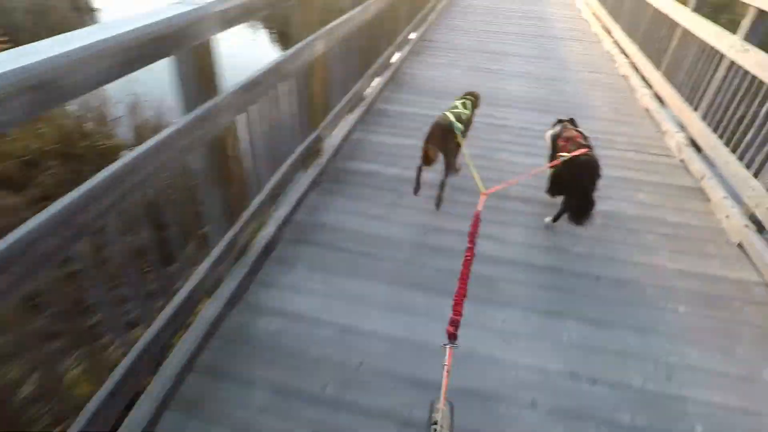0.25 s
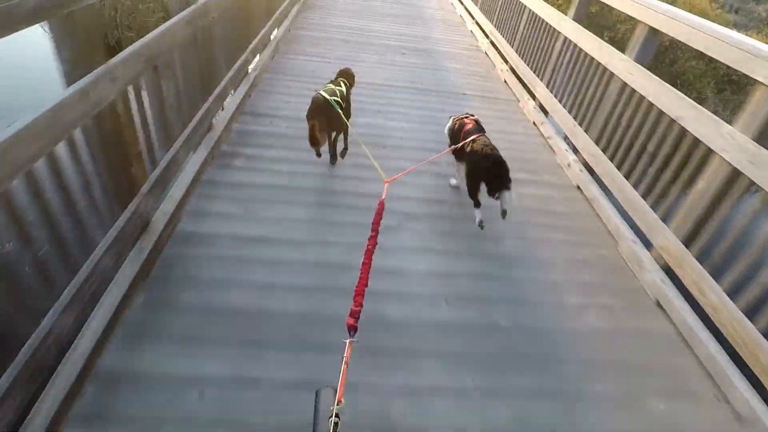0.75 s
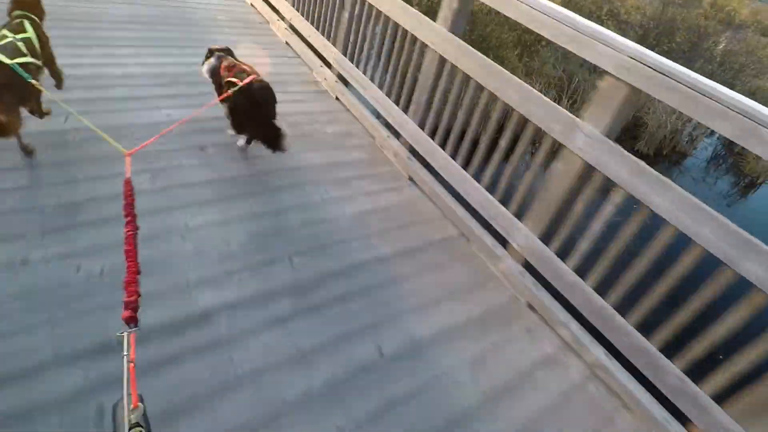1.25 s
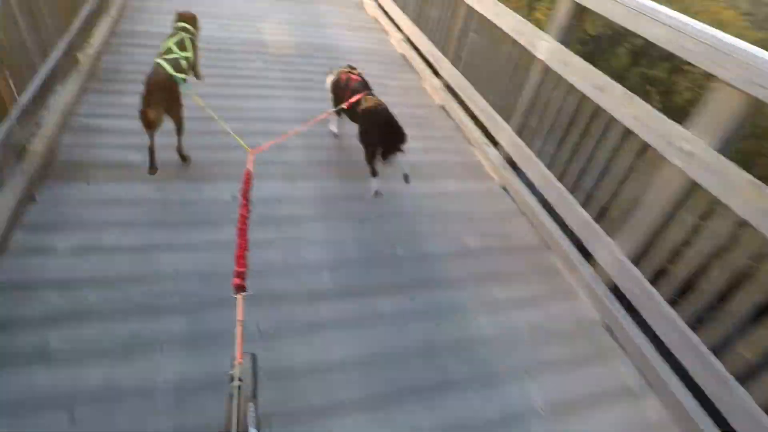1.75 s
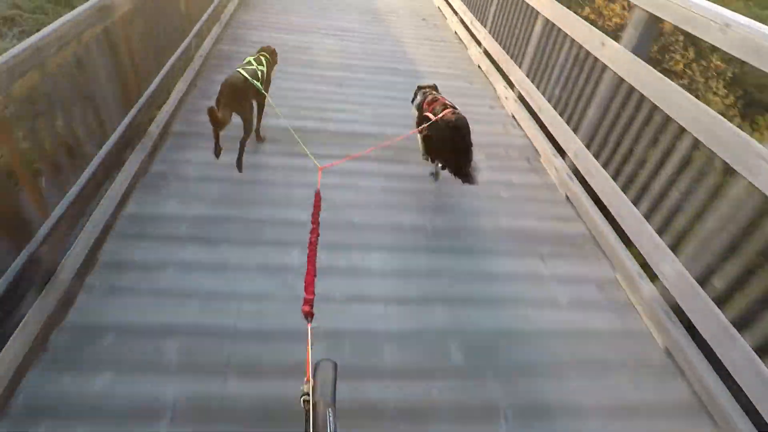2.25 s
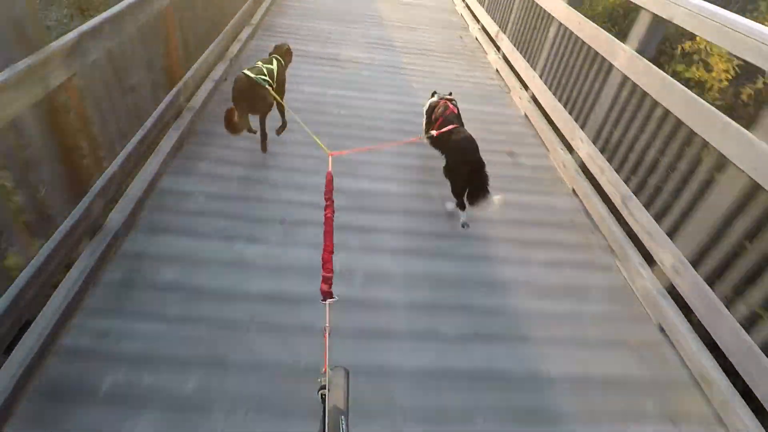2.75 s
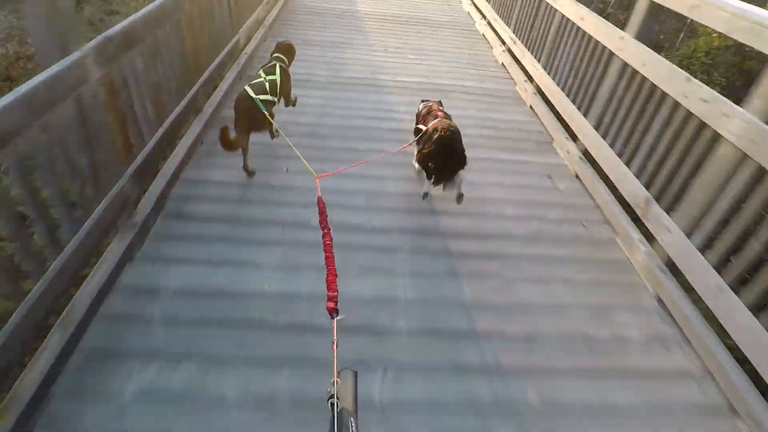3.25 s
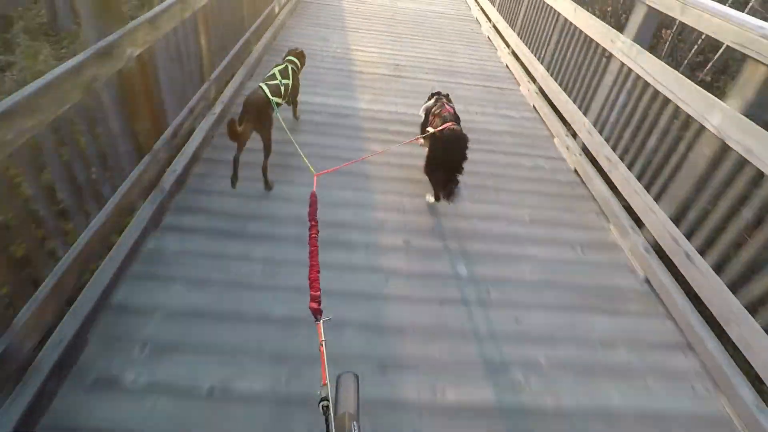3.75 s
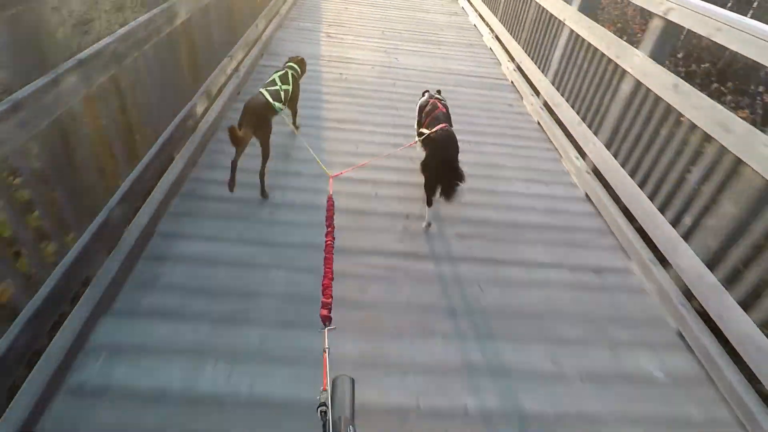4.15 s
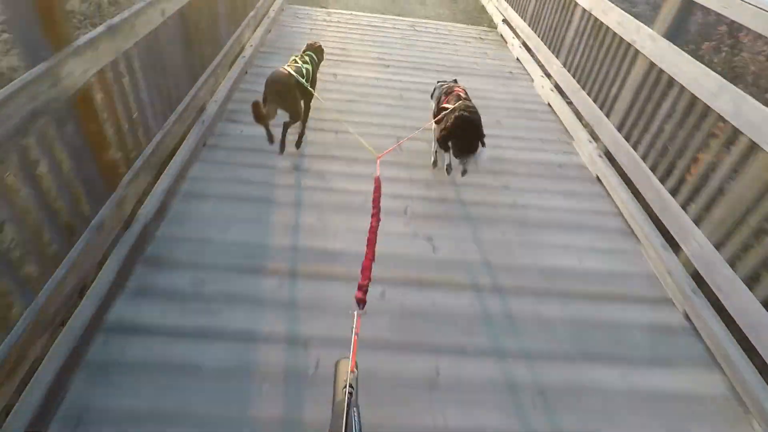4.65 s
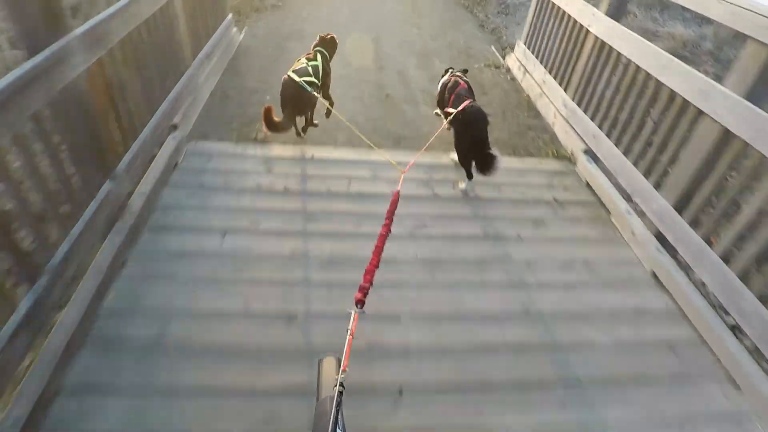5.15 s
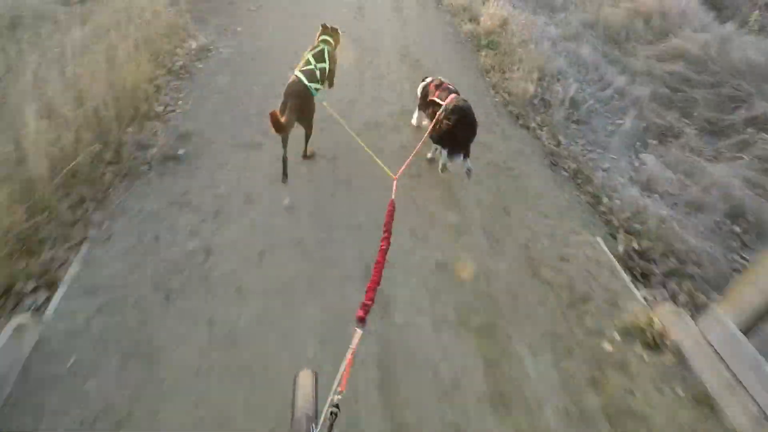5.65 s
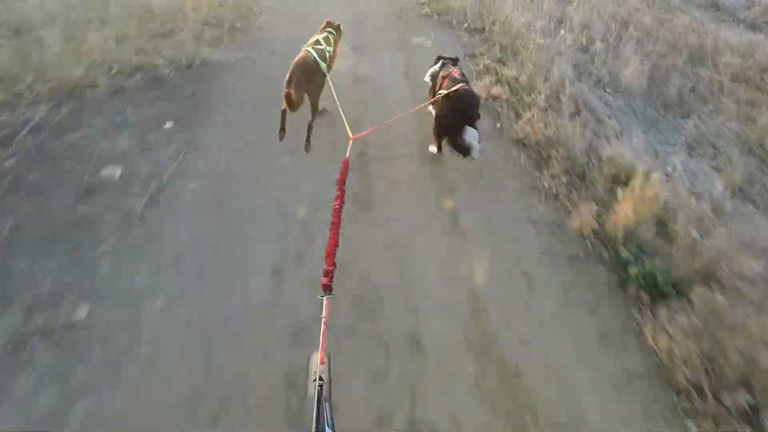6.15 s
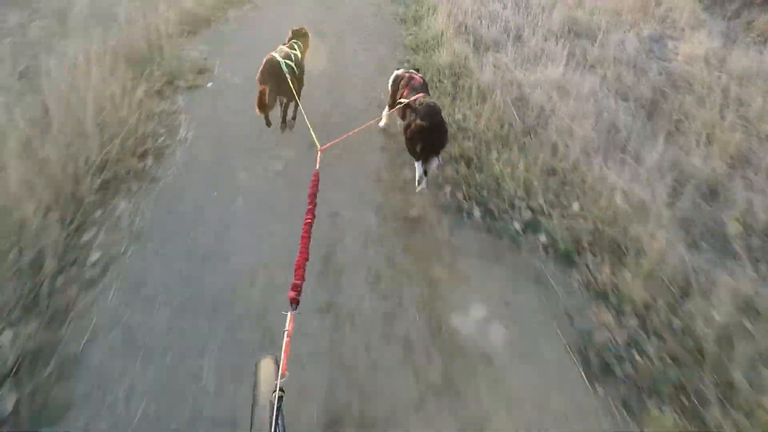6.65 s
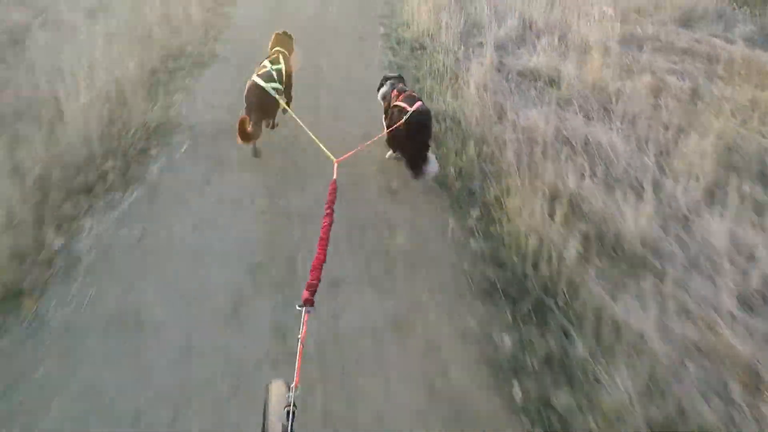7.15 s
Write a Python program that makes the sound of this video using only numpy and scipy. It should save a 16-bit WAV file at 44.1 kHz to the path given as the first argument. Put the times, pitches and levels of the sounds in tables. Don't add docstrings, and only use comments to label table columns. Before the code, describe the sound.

Outdoors, close wind noise dominates a microphone on a moving rider: low thuds, buffeting and crackling gusts, easing briefly as it turns aside early on. Beneath it, two running dogs click their claws on wooden planks, tags jingle with each stride and tyres hiss faintly. Leaving the bridge, a metal hook clinks and tags ring brightly; then paws are softer on dirt.

```python
import sys
import numpy as np
from scipy import signal
from scipy.fft import rfft, irfft, next_fast_len
from scipy.io import wavfile
from scipy.ndimage import uniform_filter1d

SR = 44100
rng = np.random.default_rng(int(sys.argv[2]) if len(sys.argv) > 2 else 0)


def undo_db(level):
    steps = np.asarray(level, float) / 20
    return 10 ** steps


def persist_wave(psi):
    counts = np.round(np.clip(psi, -1, 1) * 32767).astype(np.int16)
    wavfile.write(sys.argv[1], SR, np.atleast_2d(counts).T)


N = 326869
TIME = np.arange(N) / SR


def colour(x, shape):
    hz, db = np.transpose(shape)
    size = next_fast_len(N)
    f = np.arange(size // 2 + 1) * SR / size + 1
    gain = undo_db(np.interp(np.log(f), np.log(hz), db))
    return irfft(rfft(x, size) * gain, size)[:N]


def unit(x):
    return x / np.sqrt(np.mean(x ** 2))


def band(x, lo_hz, hi_hz, order=2):
    return signal.sosfilt(signal.butter(order, [lo_hz, hi_hz], "band", fs=SR, output="sos"), x)


def walk(rate):
    hold = int(SR / rate)
    levels = rng.standard_normal(N // hold + 1)
    steps = np.repeat(levels, hold)
    return unit(uniform_filter1d(uniform_filter1d(steps, hold), hold)[:N])


def swell(time_s, span_s, db):
    return db * np.maximum(1 - abs(TIME - time_s) / span_s, 0)


def strikes(times, sizes):
    out = np.zeros(N)
    np.add.at(out, np.clip((times * SR).astype(int), 0, N - 1), sizes)
    return out


def ring(x, hz, t60):
    r, w = np.exp(-np.log(1000) / (t60 * SR)), 2 * np.pi * hz / SR
    return signal.lfilter([0, np.sin(w)], [1, -2 * r * np.cos(w), r * r], x)


# (time [s], level [dB])
ROLLING = [(0.0, -50.5), (0.1, -47), (1.07, -49), (1.25, -53.5), (1.45, -53.5), (1.859, -48), (2.25, -51),
           (2.72, -49.5), (5.51, -49.5), (5.61, -52), (6.21, -53.5), (6.38, -49.5), (6.9, -49), (7.41, -51)]
# (frequency [Hz], density [dB per Hz])
PLANK_SPECTRUM = [(300, -36), (500, 2.5), (900, -11), (1650, -1), (2300, -1.5), (2800, -3.5), (3400, -11),
                  (3900, -3), (5000, -10.5), (5600, -12.5), (6200, -12), (7200, -16), (10000, -31)]
# (frequency [Hz], density [dB per Hz])
DIRT_SPECTRUM = [(1530, -31), (2600, 1), (2930, -4.5), (3560, -3), (4570, 2), (5600, -8), (5930, -7),
                 (6620, -15.5), (6900, -10.5), (8970, -45), (15200, -120)]
# (start [s], end [s])
BRIDGE_END = (3.8, 6.2)


def dirt_share(time_s):
    return np.interp(time_s, BRIDGE_END, (0, 1))


def tyres():
    time_s, level_db = np.transpose(ROLLING)
    grit_size = undo_db(2.5 * np.minimum(rng.exponential(size=N), 4))
    grit = rng.standard_normal(N) * (rng.random(N) < .03) * grit_size
    tread = rng.standard_normal(N) * undo_db(2.0 * walk(14) + 2.7 * walk(60))
    hiss = unit(tread) + .5 * unit(grit)
    planks, dirt = colour(hiss, PLANK_SPECTRUM), colour(hiss, DIRT_SPECTRUM)
    planks /= np.std(band(planks, 2780, 6700, order=4))
    dirt /= np.std(band(dirt, 2780, 6700, order=4))
    top = colour(planks, [(3900, -40), (4400, 0)])
    planks = planks - top + top * undo_db(np.interp(TIME, (0.46, .62), (-4, 0)))
    share = dirt_share(TIME)
    return ((1 - share) * planks + share * dirt) * undo_db(np.interp(TIME, time_s, level_db) + 3.0)


# (time [s], peak [dB], mode [Hz])
GLINTS = [(.051, -72, 9180), (.055, -70, 9830), (.1, -65, 9950), (.115, -64, 9535), (.13, -65, 8707),
          (.15, -63, 10682), (.165, -56, 9830), (.1585, -59, 8090), (.2628, -68, 8707), (.285, -66, 9950),
          (.7327, -61, 9180), (.9014, -67, 8340), (1.0735, -64, 9830), (1.1373, -58, 9180),
          (1.14, -64, 9535), (1.245, -67, 8970), (1.295, -64, 8340), (1.325, -70, 9950), (1.37, -65, 9950),
          (1.3728, -65, 8090), (1.5025, -67, 8090), (1.5334, -61, 9180), (1.53, -57, 9535),
          (1.53, -66, 8707), (1.6931, -64, 8340), (1.695, -67, 9950), (1.695, -64, 10682),
          (2.3106, -57, 8707), (2.33, -60, 9180), (2.5466, -73, 8340), (2.6948, -59.5, 9180),
          (3.5024, -60, 8707), (3.51, -60.5, 9535), (4.2532, -63, 9830), (4.4862, -64, 8090),
          (4.6997, -59, 9180), (4.9177, -64, 8340), (5.0624, -58, 9180), (5.08, -60, 8707),
          (5.4475, -62, 9180), (5.44, -63, 9950), (5.5967, -63, 8090), (5.61, -63, 9830),
          (5.66, -51, 10682), (5.7274, -61, 9830), (5.74, -64, 9180), (5.8097, -50, 10682),
          (5.8292, -47, 9950), (5.875, -56, 9830), (5.9589, -55, 9830), (5.955, -52, 10682),
          (6.0601, -62, 9830), (6.111, -62, 9830), (6.2143, -66, 8090)]
HIGH_MODES = np.array([8090, 8340, 8707, 8970, 9180, 9535, 9830, 9950, 10682])


def glints():
    out = np.zeros(N)
    for time_s, db, hz in GLINTS:
        nearest_hz = HIGH_MODES[abs(HIGH_MODES - hz).argmin()]
        out += ring(strikes(np.array([time_s]), undo_db(db + 12)), nearest_hz, t60=0.22)
    return undo_db(2.5 * walk(60)) * out


def clink(table, modes, rattle_db, beam_db, upper=()):
    time_s, db, *upper_db = np.transpose(table)
    chance = rng.standard_normal((len(time_s), 4, len(modes) + 1))
    rattle = (rng.random(N) < 45 / SR) * undo_db(rattle_db + 1.2 * walk(3))
    out = np.zeros(N)
    for k, (hz, mode_db, t60) in enumerate(modes):
        extra_db = sum(e * (k in upper) for e in upper_db)
        size = undo_db(db - 7.0 + 1.9 * chance[:, 0, k] + extra_db)
        touches = strikes(time_s, size) + rattle * rng.standard_normal(N) * undo_db(-.6 * max(mode_db, 0))
        for bounce in (1, 2, 3):
            bounce_s = time_s + bounce * 0.014 + 0.0038 * chance[:, bounce, -1]
            touches += strikes(bounce_s, 0.54 ** bounce * size * chance[:, bounce, k])
        out += undo_db(mode_db + beam_db * walk(70)) * ring(touches, hz, t60)
    return out


# (time [s], peak [dB], upper mode [dB])
HOOK_KNOCKS = [
    (5.6052, -40, -5.5),
    (5.8254, -38.5, -1),
    (5.965, -49, -19),
]
# (frequency [Hz], level [dB], 60 dB decay [s])
HOOK_MODES = [(3690, 2, .27), (3780, -2, .05), (4020, 3, .12), (3712, -4, .2)]


def snap_hook():
    return clink(HOOK_KNOCKS, HOOK_MODES, rattle_db=-120, beam_db=1.5, upper=(2,))


# (time [s], peak [dB], upper pair [dB])
SECOND_CLINKS = [(0.162, -39, -16), (0.33, -56, -15), (0.5601, -48, -17), (1.1812, -46, -16),
                 (1.295, -55, -14), (1.5203, -55, -10), (1.69, -48, -11), (7.1686, -54, -11),
                 (1.8557, -45.5, -13), (2.1655, -53, -30), (4.27, -45, -14), (2.5482, -50, -14),
                 (2.934, -41.5, -9), (3.1183, -42, -19.5), (3.5184, -45.5, -19), (3.5528, -41, -28),
                 (5.4983, -47, -18), (3.7359, -46.5, -21), (3.9684, -47, -34), (4.4672, -45, -19),
                 (4.5226, -38.5, -21), (5.0838, -50, -19), (5.32, -48, -28), (5.42, -49, -9),
                 (5.6061, -36, -16), (5.6595, -33.5, -8), (5.7069, -39, -19), (5.8257, -32.5, -22),
                 (5.951, -39, -16), (6.05, -50, -11), (6.124, -41, -20), (6.19, -49, -12),
                 (6.2756, -42.5, -20.5), (7.0, -47, -12)]
# (frequency [Hz], level [dB], 60 dB decay [s])
SECOND_MODES = [(6506, -2, .2), (6485, -5, .15), (6665, -4, .16), (6695, -5, .12), (7325, 3, .28),
                (7360, 3, .2)]


def second_dog_tags():
    return clink(SECOND_CLINKS, SECOND_MODES, rattle_db=-61.5, beam_db=4.0, upper=(4, 5))


# (time [s], peak [dB])
FIRST_CLINKS = [(0.5746, -47), (0.7472, -36), (1.1363, -38), (1.5289, -39), (1.9357, -32), (2.3316, -36.5),
                (2.7202, -38), (3.1153, -39.5), (3.5179, -40), (3.9055, -40.5), (4.3001, -40),
                (4.6942, -46), (5.0789, -39.5), (5.4712, -37), (6.2455, -39), (7.0509, -38.5)]
# (frequency [Hz], level [dB], 60 dB decay [s])
FIRST_MODES = [(5880, -3, .15), (5915, -1.5, .12), (5990, -4, .1), (6150, -2, .1), (6200, -2, .08)]


def first_dog_tags():
    return clink(FIRST_CLINKS, FIRST_MODES, rattle_db=-63.5, beam_db=4.4)


# (time [s], peak [dB], ring [Hz], knock [dB])
LANDINGS = [(0.018, -30.5, 3730, 9.5), (0.1713, -30, 3640, 9.5), (0.281, -29, 3860, 7),
            (0.4261, -27.5, 3950, 12.5), (0.5075, -21.5, 3960, -5), (0.5763, -24, 3870, 3),
            (0.6234, -23, 4200, -10), (1.007, -29, 4120, -6), (1.1347, -21.5, 5000, -6),
            (1.2967, -24.5, 5370, -7), (1.365, -28.5, 3720, 2), (1.5348, -27.5, 4220, -2),
            (1.6601, -25.5, 3730, -5), (1.9048, -25, 4140, -1.5), (2.2444, -23.5, 4350, 3.5),
            (2.5616, -25, 4380, 3), (2.718, -26, 4100, -2), (3.3424, -25, 4300, 2),
            (3.443, -24.5, 3130, -3), (3.5158, -26, 4030, 0), (3.5828, -22, 4620, -15),
            (3.7363, -29.5, 4000, 8.5), (3.833, -25.5, 4170, -0.5), (3.9095, -27, 4300, -3.5),
            (4.132, -30, 3900, 7), (4.523, -26.5, 3900, 1), (4.6289, -20.5, 4200, 0),
            (4.696, -26, 5170, -10), (4.8227, -27.5, 4500, 1), (4.91, -29, 3010, 4)]
# (time [s], peak [dB])
MORE_LANDINGS = [(0.1028, -24.5), (0.351, -30), (0.7457, -29), (1.0201, -27.5), (1.4541, -32), (1.72, -33),
                 (1.8563, -32), (2.0043, -32), (2.0966, -35), (2.146, -30), (2.3565, -32), (2.512, -32),
                 (2.7711, -32), (2.8793, -29), (2.937, -29), (3.0733, -31), (3.1158, -35), (3.272, -28.5),
                 (3.7938, -27), (4.223, -28), (4.879, -31), (4.9477, -30), (5.5293, -32), (5.0, -33),
                 (5.8276, -34.5), (5.9439, -35), (6.2103, -31), (6.2482, -29), (6.825, -33), (7.081, -31),
                 (0.2643, -42), (0.2887, -30), (1.264, -39), (1.318, -34), (1.69, -34), (2.2278, -33),
                 (3.4825, -32), (4.0527, -35.5), (5.2879, -33), (5.4784, -33), (6.1863, -35),
                 (6.6288, -37), (6.7775, -32), (7.1207, -35.5), (7.204, -33)]


def paws():
    landings = list(LANDINGS)
    for (time_s, db), d in zip(MORE_LANDINGS, np.tanh(rng.standard_normal(len(MORE_LANDINGS)))):
        landings.append((time_s, db, 4200 + 250 * d, 4.5 - 11 * dirt_share(time_s)))
    out, age = np.zeros(N + 2048), np.arange(2048) / SR
    contact = np.exp(-((age - .004) / .0026) ** 2)
    scuff = 0.35 * np.tanh(age / .004) * np.exp(-age / 0.018)
    for time_s, db, hz, knock_db in landings:
        burst = rng.standard_normal(2048) * (contact + scuff)
        claw = band(burst, hz * 0.9, hz * 0.98, order=1) + 0.16 * band(burst, 2100, 5500, order=1)
        knock = band(burst, 2100, 2700, order=1)
        top = band(burst, 6300, 6700, order=2)
        hit = claw / abs(claw).max()
        hit += undo_db(knock_db) * knock / abs(knock).max()
        hit += undo_db(-28.5) * top / abs(top).max()
        start = int((time_s - .002) * SR)
        out[start:start + 2048] += undo_db(db - 4.0) * hit
    return out[:N]


# (time [s], peak [dB])
SLAPS = [(0.502, -15), (0.527, -10), (0.576, -9.5), (0.623, -9.5), (0.85, -13), (0.867, -19),
         (0.903, -14.5), (0.951, -9), (1.004, -11), (1.03, -14), (1.056, -12), (1.782, -13), (1.92, -6),
         (2.017, -22), (2.052, -17), (2.116, -12), (2.184, -7.5), (2.267, -13), (2.29, -14), (2.423, -16),
         (2.635, -17), (2.664, -10), (2.717, -14.5), (2.772, -13), (2.795, -15), (2.834, -13), (2.881, -12),
         (2.961, -13.5), (3.035, -15), (3.109, -19), (3.136, -9.5), (3.2, -11.5), (3.219, -17),
         (3.253, -13.5), (3.284, -11.5), (3.401, -15), (3.537, -22.5), (3.549, -16), (3.636, -18),
         (3.825, -12.5), (4.114, -10), (4.182, -12), (4.303, -10), (4.502, -12), (4.52, -18), (4.551, -16),
         (4.597, -14), (4.997, -8.5), (5.036, -17), (5.094, -19), (5.454, -10), (5.603, -12), (5.686, -18),
         (5.964, -14.5), (6.06, -19.5), (6.126, -16), (6.472, -10), (6.513, -16.5), (6.544, -10.5),
         (6.935, -9)]


def slaps():
    out, hush_db, age = np.zeros(N + 1024), np.zeros(N), np.arange(1024) / SR
    for time_s, db in SLAPS:
        burst = rng.standard_normal(1024) * np.exp(-age / .0035) + 3 * (age == 0)
        burst = band(band(burst, 350, 1000, order=1), 250, 1550, order=3)
        start = int((time_s - .0015) * SR)
        out[start:start + 1024] += undo_db(db - 1) * burst / abs(burst).max()
        hush_db = np.minimum(hush_db, -9 * ((TIME > time_s - .007) & (TIME < time_s + .002)))
    return out[:N], uniform_filter1d(hush_db, size=96)


# (frequency [Hz], density [dB per Hz])
EDDY_SPECTRUM = [(180, -33.5), (300, -0.5), (346, -4), (617, -6), (1180, -12.5), (1790, -24.5),
                 (3400, -45.5), (4420, -74), (7480, -120)]
# (time [s], length [s], drop [dB])
LULLS = [
    (2.992, 0.04, -3),
    (3.9, 0.0091, -12),
    (2.6, 0.013, -19),
    (0.92, 0.011, -10),
    (3.8, .03, -2),
]


def port_edge(flow_db, puff_db):
    eddy_db = flow_db + puff_db
    pops = rng.standard_normal(N) * (rng.random(N) < .025) * rng.random(N)
    depth_db = 5.0 + 5 * np.exp(-((TIME - 2.56) / 0.69) ** 2)
    burst = undo_db(depth_db * np.tanh(0.056 * np.maximum(walk(90), -1.2) + 0.36 * walk(240)))
    rush = (rng.standard_normal(N) + 0.77 * unit(pops)) * burst
    power = uniform_filter1d(uniform_filter1d(rush ** 2, size=SR // 30), size=SR // 30)
    rush = colour(rush / np.sqrt(power), EDDY_SPECTRUM)
    rush = colour(rush, [(180, -27.5), (400, -6.5)])
    soft = colour(rush, [(700, 0), (1000, -6), (1600, -30)])
    edge_db = -7 - 0.041 * (flow_db + 24.0) + 0.5 * puff_db * (flow_db > -30)
    edge_db = edge_db - 2 * np.exp(-((TIME - 4.05) / 1.2) ** 2)
    sharp = unit(rush - soft) * undo_db(edge_db + 1.4 * walk(75) - 0.94)
    slap, hush_db = slaps()
    lull_db = sum(db * ((TIME > s) & (TIME < s + length)) for s, length, db in LULLS)
    lull_db = uniform_filter1d(lull_db, size=128)
    return slap + (unit(soft) + sharp) * undo_db(eddy_db + hush_db + lull_db + .5)


# (frequency [Hz], density [dB per Hz])
BUFFET_SPECTRUM = [(12, -41), (20, -2.5), (43, -6.5), (97, -0.5), (145, -1.5), (177, -1), (226, -1),
                   (343, -7.5), (500, -7.5), (650, -45), (1100, -120)]
# (time [s], level [dB])
SURGES = [(.3, -2.5), (.55, 0.5), (.8, 1.5), (1.12, 3), (1.35, -2), (1.71, -0.5), (2.0, -0.5), (2.2, 1),
          (2.42, 1), (2.7, 2), (2.9, 0.5), (3.1, -1.5), (3.4, -3), (3.66, -1), (3.9, -0.5), (4.2, 0),
          (4.45, 1), (4.55, 1.5), (4.8, -1.5), (5.0, -1.5), (5.199, 1.5), (5.38, -1), (5.6, 0),
          (5.85, -0.5), (6.1, 1), (6.35, 1), (6.58, 1.5), (6.85, 0), (7.05, -2.5), (7.3, 0)]


def buffeting(head_db, flow_db, puff_db):
    swirl = colour(rng.standard_normal(N), BUFFET_SPECTRUM)
    low = colour(swirl, [(60, 0.5), (95, -23.5)])
    thud = unit(low) * undo_db(-27.5 + 0.16 * (head_db + 17.0) + 4 * np.tanh(walk(16)))
    body = unit(colour(swirl - low, [(220, -7.0), (330, -6), (520, -25.0)]))
    deep = colour(body, [(170, -0.5), (300, -8.0)])
    shelter_db = 0.28 * np.minimum(flow_db + puff_db + 21.5, 0)
    surge_db = sum(swell(s, .11, db) for s, db in SURGES)
    buffet_db = head_db + .3 * puff_db + surge_db + 1.1 * walk(30)
    return thud + (deep + (body - deep) * undo_db(shelter_db)) * undo_db(buffet_db)


# (time [s], head wind [dB], flow over the port edge [dB])
WIND = [(0.0, -27, -43.5), (0.3, -18.5, -40), (0.454, -16.5, -42.5), (0.529, -13.5, -20.5),
        (0.68, -14.5, -24), (1.08, -17.5, -22.5), (1.12, -21, -26.5), (1.2, -28.5, -42.5),
        (1.4, -24.5, -48.5), (1.67, -24, -45.5), (1.786, -16.5, -22.5), (1.94, -13, -23),
        (2.35, -15, -24.5), (2.6, -18.5, -26), (3.18, -15.5, -22.5), (5.06, -16, -24), (6.15, -16, -23),
        (7.41, -15, -23.5)]
# (time [s], rise and fall [s], level [dB])
PUFFS = [(.21, 0.044, 1), (.57, .06, 2.5), (.8, 0.055, -3.5), (1.372, 0.039, 10), (1.457, 0.036, 4),
         (1.532, 0.055, 6.5), (2.155, 0.074, -2), (2.415, 0.028, -10), (2.699, 0.032, -3), (2.968, 0.21, 3),
         (3.012, 0.041, -19.5), (3.102, 0.035, -10), (3.208, 0.033, -4), (3.362, 0.066, 2),
         (3.682, 0.2, -1.5), (4.075, 0.048, -1.5), (4.126, 0.076, 3), (4.335, 0.03, 4),
         (4.469, 0.044, -4.5), (4.515, 0.074, 4), (4.75, 0.039, -7), (4.42, 0.03, -2.5), (1.04, 0.052, 2),
         (6.76, 0.017, -2), (5.3, 0.074, 1.5), (5.073, 0.04, -1), (5.118, 0.035, 3), (5.819, 0.29, -3.5),
         (5.902, 0.042, 4), (6.036, 0.066, -4.5), (6.426, .07, 3), (7.03, 0.29, 1.5)]


def wind():
    time_s, head, flow = np.transpose(WIND)
    head_db, flow_db = np.interp(TIME, time_s, head), np.interp(TIME, time_s, flow)
    puff_db = sum(swell(s, span, db) for s, span, db in PUFFS)
    return buffeting(head_db, flow_db, puff_db) + port_edge(flow_db, puff_db)


def scene():
    metal = glints() + snap_hook() + second_dog_tags() + first_dog_tags()
    return np.tile(tyres() + metal + paws() + wind(), (2, 1))


def gate_treble(x, low_db, high_db, mask, waver_db):
    f, _, z = signal.stft(x, SR, nperseg=1536)
    power = abs(z[:-1]) ** 2
    waver = uniform_filter1d(rng.standard_normal((96, z.shape[1])), size=5, axis=1)
    bands = power.reshape(-1, 8, z.shape[1]).max(axis=1) * undo_db(2 * waver_db * waver)
    bar_db = np.where(f > 4700, low_db, -200)
    bar_db = np.where(f > 6850, high_db - 7 * (f > 8500), bar_db)[:-1, None]
    loud = power.sum(axis=0) / power.sum(axis=0).mean()
    z[:-1] *= np.repeat(bands, 8, axis=0) > undo_db(bar_db) ** 2 * loud ** mask
    return signal.istft(z, SR, nperseg=1536)[1][:N]


# (frequency [Hz], level [dB])
PORT_DIFFERENCE = [(60, -88), (100, -85), (170, -79), (290, -56.5), (490, -38), (830, -24.5), (1400, -20.5),
                   (2360, -22.5), (3990, -22), (6750, -24)]


def low_pass(x):
    return signal.sosfilt(signal.butter(12, 10800, fs=SR, output="sos"), x)


def record(dry):
    dull = colour(dry[0], [(6600, 0.5), (7200, -8.5), (11000, -16.5)])
    rounded = np.tanh(0.67 * dull) / 0.73
    mid = gate_treble(rounded, low_db=-75.5, high_db=-73.0, mask=0.8, waver_db=5.0)
    side = colour(mid, PORT_DIFFERENCE)
    return low_pass(np.array([mid - side, mid + side]))


dry = scene()
out = record(dry)
persist_wave(out)
```